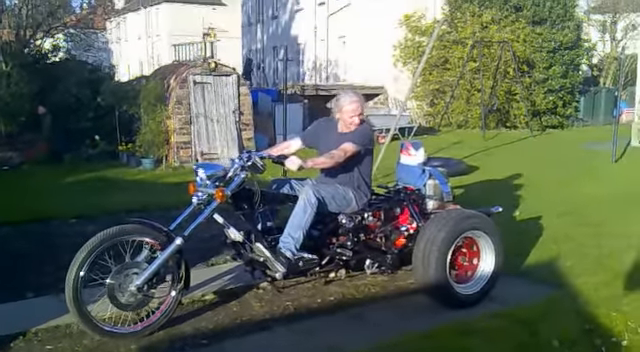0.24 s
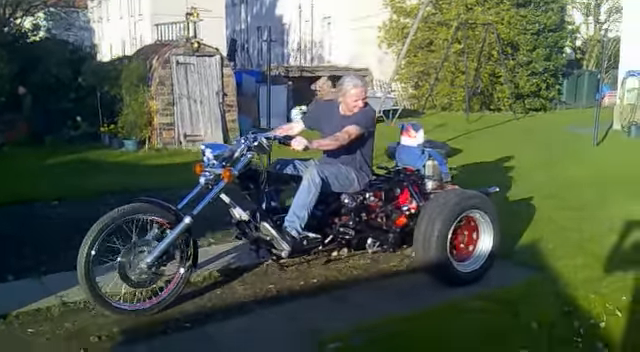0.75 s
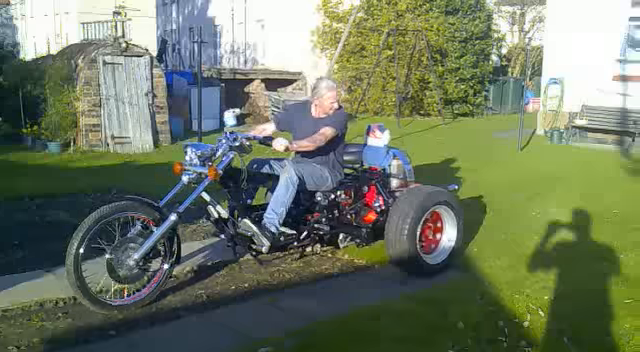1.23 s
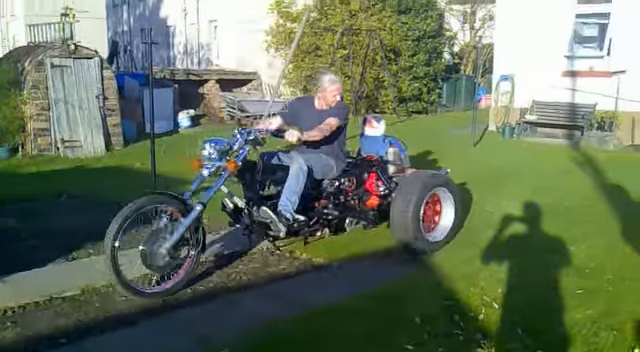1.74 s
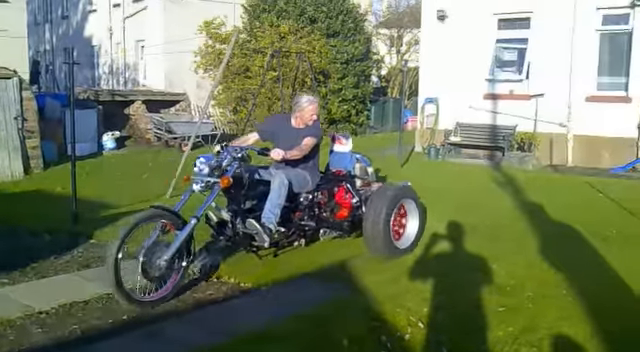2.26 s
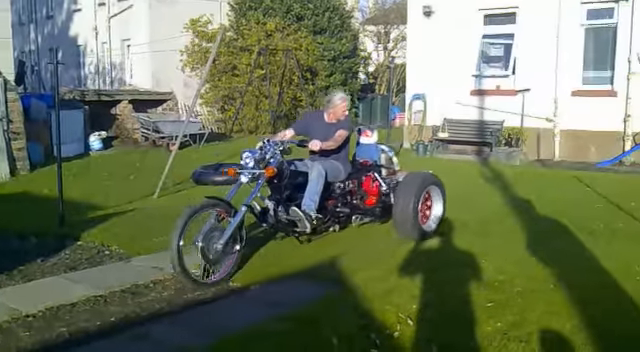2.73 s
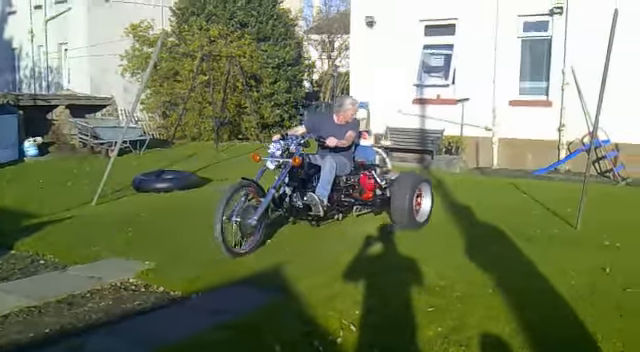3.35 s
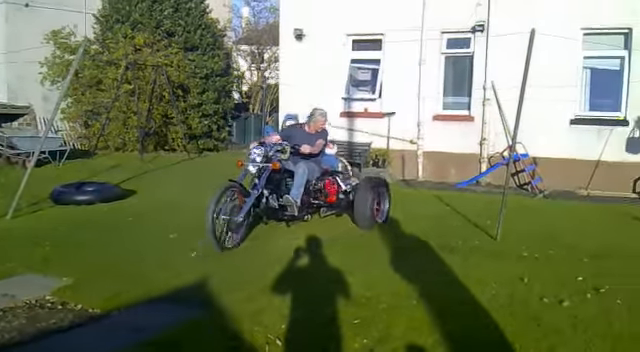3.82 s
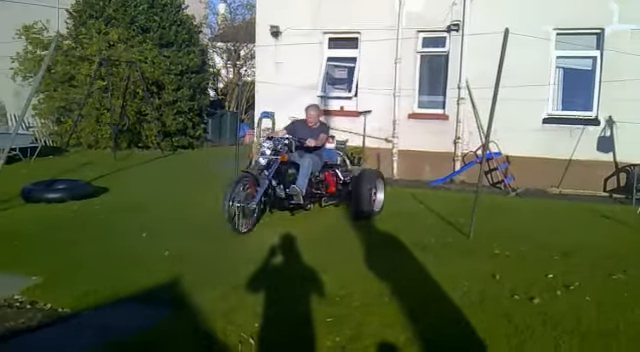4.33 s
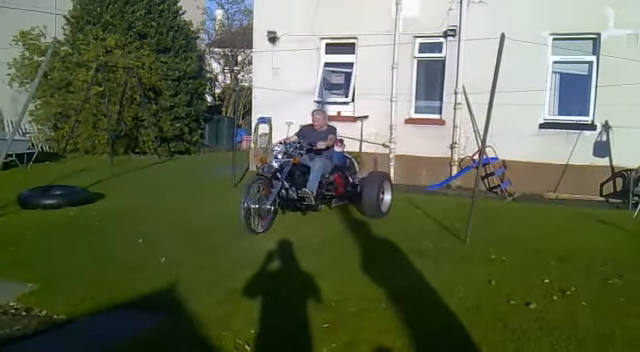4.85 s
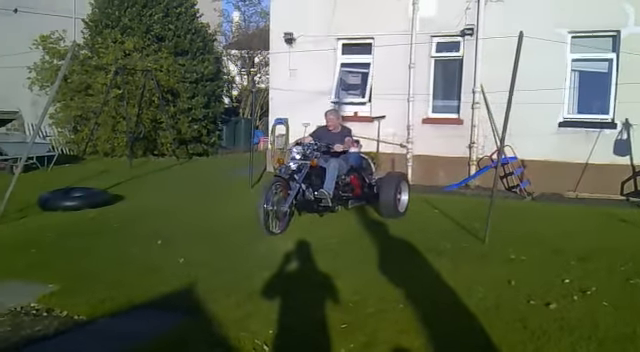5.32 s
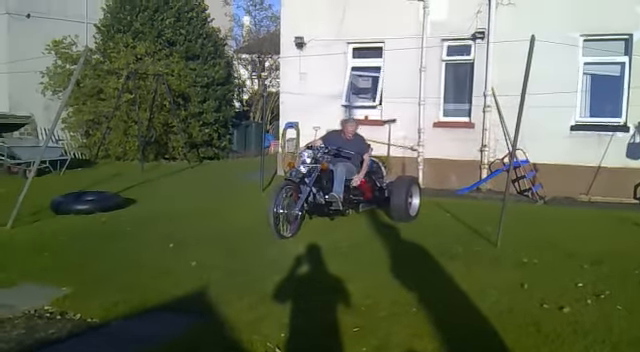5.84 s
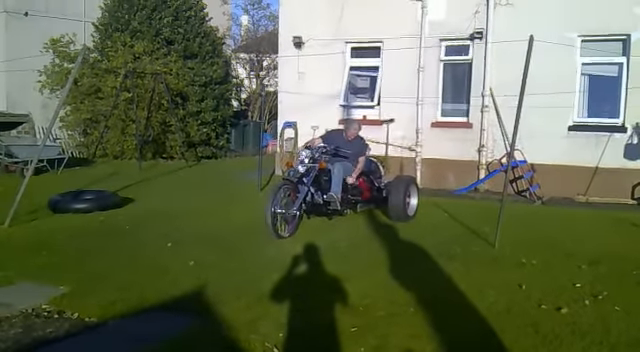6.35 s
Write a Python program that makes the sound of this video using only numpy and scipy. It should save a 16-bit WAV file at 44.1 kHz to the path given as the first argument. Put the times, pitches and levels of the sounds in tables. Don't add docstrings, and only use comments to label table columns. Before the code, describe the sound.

A small air-cooled engine on a lawn throbs at fast idle, revs hard, holds a rattly drone, then drops to a slow ticking tick-over.

```python
import sys
import numpy as np
from scipy import signal
from scipy.io import wavfile
from scipy.ndimage import uniform_filter1d

SR = 44100
rng = np.random.default_rng(int(sys.argv[2]) if len(sys.argv) > 2 else 0)


def field_ratio(decibels):
    return 10 ** (np.asarray(decibels, dtype=float) / 20)


def wav_out(sig):
    wavfile.write(sys.argv[1], SR, np.round(np.clip(np.atleast_2d(sig).T, -1, 1) * 32767).astype(np.int16))


N = 290178

# t/s, level/dB
EFFORT = [(0.0, -31), (1.15, -34.5), (1.39, -31.5), (1.61, -21.5), (1.85, -22.5), (2.07, -30.5),
          (2.58, -29), (3.04, -31.5), (4.32, -32), (4.71, -42.5), (5.13, -48), (5.46, -43.5), (6.49, -44.5),
          (6.58, -48.5)]
# t/s, share of the far front view/0-1
TURNING = [
    (0, 0.028),
    (1.3, 0.18),
    (2.2, 0.57),
    (3.2, 0.77),
    (6.58, 0.73),
]


def exhaust(speed, cycle):
    # order of the cycle, level/dB
    loaded = [(2, -59), (3, -40), (4, 26), (5, -5.5), (6, -13), (7, -11), (8, -19), (9, -5.5), (10, -12.5),
              (11, -18), (12, -39), (13, -3), (14, -22), (15, -17), (16, -30), (17, -10.5), (18, -33),
              (19, -21), (20, -32), (21, -47), (22, -25.5), (23, -56.5), (24, -24)]
    # order, level/dB
    light_idle = [(2, -41), (3, -52), (4, -18), (5, -21.5), (6, -16), (7, -40), (8, -3.5), (9, -28.5),
                  (10, -5), (11, -20), (12, -11), (13, -15), (14, -15), (15, -15), (16, -14), (17, -11.5),
                  (18, -34), (19, -17), (20, -27), (21, -6), (22, -13.5), (23, -10), (24, -19.5)]
    # order, level/dB
    part_throttle = [(2, -46), (3, -46), (4, -3), (5, -18), (6, -6.5), (7, -20), (8, -10.5), (9, -2.5),
                     (10, -1), (11, -64), (12, -21.5), (13, -12), (14, -6.5), (15, -29), (16, -22.5),
                     (17, -15.5), (18, -26), (19, -13.5), (20, -71), (21, -32), (22, -53), (23, -26),
                     (24, -25)]
    # order, level/dB
    tick_over = [(2, -57), (3, -27), (4, 11), (5, 8), (6, -12), (7, 11), (8, 9), (9, -10.5), (10, -25),
                 (11, -14), (12, -9), (13, -15), (14, 3), (15, -12), (16, -15.5), (17, -13), (18, -7),
                 (19, -20), (20, 5.5), (21, -34), (22, -45), (23, -66), (24, -5.5)]
    cylinder_turns = [0.0, .02, .52, .55]
    # f/Hz, width/Hz, level/dB
    pipe = [(65, 7.5, 15), (99.5, 22, 2.5), (138, 16, 5), (225.4, 57, 5)]
    # f/Hz, level/dB per Hz
    turbulence = [(30, -20), (60, -33), (150, -13), (260, -10), (380, -26)]
    # t/s, light share/0-1, part-throttle share/0-1, throb place/cycles
    throttle = [(0, 0.57, 0.33, 0.43), (.55, 0.48, 0.25, 0.66), (1.0, 0.8, 0.06, 0.51), (1.4, .8, 0, 0.56),
                (1.9, 0.02, 0.19, 0.94), (2.5, 0.16, 0.53, 0.93), (3.0, 0.43, 0.07, .92),
                (3.5, 0.2, 0.99, 0.58), (4.28, 0.33, 0.64, .86), (4.4, 0.03, 0, 0.76), (5.3, 0, 0.46, 0.92),
                (6.0, 0.2, 0.15, 0.92), (6.25, 0.4, 0.07, 0.84)]
    pulse_place = 0.45

    thin = slice(0, N, 10)
    light, easy, place = (np.clip(c[thin], 0, 1) for c in in_time(throttle))
    since, rise = (c[thin] for c in shut())
    slow = np.clip(rise * (0.41 + 0.093 * since), 0, 1)
    misfires = 0.12 + 0.3 * np.exp(-since / 0.4)
    rough = np.clip(0.13 + rise * misfires, 0, 0.9)
    sums, powers = 0, 1e-12
    patterns = zip(light_idle, loaded, part_throttle, tick_over)
    for (k, light_db), (_, load_db), (_, easy_db), (_, slow_db) in patterns:
        k = round(k)
        hz = k * speed[thin]
        level_db = load_db + light * (light_db - load_db)
        level_db = level_db + easy * (easy_db - load_db) + slow * (slow_db - load_db)
        pipe_db = sum(peak_db / (1 + ((hz - mid) / width) ** 2) for mid, width, peak_db in pipe)
        size = field_ratio(level_db + pipe_db)

        turns = k * (cycle[thin] - pulse_place) + cylinder_turns[k % 4]
        turns += 0.5 * (k % 4 == 2 and k > 12)
        turns += (place + 0.21 * (k // 4 - 1)) * (k % 2)
        turns += 0.012 * k * rough * drift(6)[thin]
        unsteady = field_ratio((1.6 + 2 * rough) * drift(4)[thin])
        wave = np.sqrt(2) * size * unsteady * np.cos(2 * np.pi * turns)

        bark = np.clip((hz - 80) / 10, 0, 1)
        split = np.array([1 - bark, bark])
        sums += wave * np.sqrt(split)
        powers += size ** 2 * split
    bands, centres = coloured(np.geomspace(38, 400, 9), patchy_db=2.5)
    rumble = (bands * field_ratio(at_hz(turbulence, centres)))[:, thin]
    noise = np.array([0.6 * rms_one(rumble[:3].sum(0)), 0.7 * rms_one(rumble[3:].sum(0))])
    mixed = np.sqrt(1 - rough ** 2) * sums / np.sqrt(powers) + rough * noise
    return signal.resample_poly((loudness() * mixed).sum(0), 10, 1)[:N]


def loudness():
    # t/s, half-length/s, boom level/dB, bark level/dB
    lurches = [(0.453, 0.57, 2.5, 1), (1.046, 0.085, -4, -1.5), (1.402, 0.11, -5, 0),
               (1.652, 0.058, 1.5, -1.5), (2.01, 0.15, -13, -3), (2.387, 0.08, -1.5, 2.5),
               (2.68, 0.06, 3.5, 1.5), (3.23, 0.08, -7, 1), (3.456, 0.13, -1.5, 2.5),
               (3.763, 0.11, 5.5, 0.5), (3.857, 0.036, 2, 2), (4.337, 0.018, -16, -10),
               (4.397, 0.057, 1, -9), (4.45, 0.076, 8.5, -1.5), (4.52, 0.028, -14, -6),
               (4.56, 0.023, 8.5, -4), (4.65, 0.044, -2, -1), (4.745, 0.038, 12, 2),
               (4.816, 0.034, -5, 4.5), (5.707, 0.33, -3, 6), (6.226, 0.062, 8.5, 4.5),
               (6.345, .025, -9, -5), (6.43, 0.066, 7, 3)]
    over_effort_db = np.array([[9.5], [6.5]])
    t = np.arange(0, N, 10) / SR
    humps_db = 0
    for s, half, boom_db, bark_db in lurches:
        humps_db = humps_db + np.exp(-((t - s) / half) ** 2) * np.array([[boom_db], [bark_db]])
    return field_ratio(in_time(EFFORT)[0][::10] + over_effort_db + humps_db)


def casing(speed, cycle):
    # f/Hz, level/dB per Hz
    side_view = [(190, -31), (330, -13), (375, -9.5), (671, 4.5), (1110, -6.5), (1300, 2.5), (1530, -11),
                 (2110, -5), (2480, -11.5), (3110, -10), (5300, -24), (6130, -29.5), (10400, -39.5),
                 (12500, -34.5), (15600, -47)]
    # f/Hz, level/dB per Hz
    front_view = [(190, -37), (330, -5.5), (527, 3.5), (802, -6), (942, 0.5), (1740, -6.5), (1920, -14),
                  (2110, -10.5), (2600, -14), (2960, -12.5), (7200, -32.5), (8460, -38.5), (10400, -43),
                  (12300, -40.5), (15600, -60)]
    # f/Hz, width/Hz, added level/dB
    fins = [(940, 120, -29), (1780, 83, -2), (2128, 185, -6.5), (2990, 160, -5.5), (5130, 560, -4)]
    puff_place, beat_place = 0.14, 0.85

    level_db = in_time(EFFORT)[0]
    top_db = -11.5 + 1.5 * shut()[1]
    depth_db = 2.6 + 0.12 * pull(speed)
    bands, centres = coloured(np.geomspace(330, 15800, 23), patchy_db=1.0)
    far = np.clip(in_time(TURNING)[0], 0, 1)
    bands = bands * ((1 - far) * field_ratio(at_hz(side_view, centres)) + far * field_ratio(at_hz(front_view, centres)))
    parts = np.array([bands[:13].sum(0), bands[13:].sum(0)])
    plain = parts.copy()
    for hz, width, peak_db in fins:
        r = np.exp(-np.pi * width / SR)
        poles = [1, -2 * r * np.cos(2 * np.pi * hz / SR), r * r]
        parts += field_ratio(peak_db) * signal.lfilter([(1 - r * r) / 2, 0, (r * r - 1) / 2], poles, plain)
    parts /= np.sqrt(uniform_filter1d(parts ** 2, size=SR, mode="reflect"))
    puff = 1.71 * np.exp(-2.5 * (4 * (cycle - puff_place) % 1)) - 0.9
    beat = puff + 0.4 * np.cos(2 * np.pi * (cycle - beat_place)) + 0.18 * drift(90)
    return field_ratio(level_db + depth_db * beat) * (parts[0] + field_ratio(top_db) * parts[1])


def fan(speed):
    turns = np.cumsum(92.9 * speed + 12 * drift(40)) / SR
    since = shut()[0]
    level_db = -48 + np.where(speed < 16.8, 1.0, 4.6) * (speed - 16.8)
    level_db += 5.5 * (1 - in_time(TURNING)[0])
    level_db -= 35 * np.exp(4 * since) * since
    level_db += 0.3 * pull(speed) * (speed > 17)
    return np.sqrt(2) * field_ratio(level_db + 2.2 * drift(40)) * np.sin(2 * np.pi * turns)


def valves(cycle):
    # t/s, place/cycles, low ring level/dB, high ring level/dB
    closings = [(0, 1.12, -42, -56), (.46, 0.87, -41.5, -74), (1.2, 0.79, -39.5, -46),
                (1.7, 0.91, -31, -34), (1.93, 1.15, -52, -59), (2.47, 1.26, -46, -35),
                (3.06, .84, -44, -43), (3.76, 0.84, -51, -37), (4.68, 0.92, -64, -64)]
    closing_db = [-8, -15, -9.5, -27]
    # f/Hz, t60/s
    knocks = [(3100, 0.0081), (4000, 0.02), (4550, 0.0059), (5200, 0.0048), (6600, 0.0042)]
    # f/Hz, t60/s
    rings = [(8350, 0.0082), (8800, 0.0062), (9400, .006)]
    # f/Hz, t60/s
    pings = [(10700, 0.0062), (12100, 0.008), (13000, 0.0017)]
    # f/Hz, t60/s
    cover = [(6300, .008), (6850, .015)]
    # f/Hz, t60/s
    slow_knocks = [(3100, 0.0096), (4050, 0.0067), (4550, 0.013), (5200, 0.0061)]

    place, ring_db, ping_db = in_time(closings)
    count = np.floor(4 * (cycle - place)).astype(int)
    at = np.flatnonzero(np.diff(count) > 0) + 1
    at = at[at < closings[-1][0] * SR]
    own_db = np.array(closing_db)[count[at] % 4] + 1.1 * rng.standard_normal(len(at))
    out = strike(at / SR, ring_db[at] + own_db, rings, 1.8, 0.001)
    out += strike(at / SR, ping_db[at] + own_db, pings, 4.8, 0.001)
    out += strike(at / SR, ring_db[at] + 0.5 * own_db + 2.0, knocks, 3.6, 0.0017)

    s, peak_db, knock_db = tappets()
    out += strike(s, 0.61 * peak_db - 23, cover, 2.5, 0.0023)
    out += strike(s, 0.7 * peak_db - 12.5, rings[:2], 0.71, 0.0015)
    out += strike(s, knock_db, slow_knocks, 1.4, 0.0022)
    out += strike(s, 0.44 * peak_db + 0.59 * knock_db - 2.5, pings[1:], 3.6, 0.0009)
    return out


def tappets():
    # t/s, leading tappet's ring level/dB, opposite tappet's knock level/dB
    rounds = [(4.772, -46, -47), (4.877, -46, -58), (4.972, -47, -54), (5.069, -43, -49),
              (5.1675, -47, -42), (5.269, -50, -51), (5.3668, -60, -46), (5.4683, -38.5, -42),
              (5.572, -42, -40), (5.6774, -35, -37), (5.7824, -30, -31.5), (5.8896, -36, -40),
              (6.001, -36, -37), (6.1147, -29, -41), (6.231, -22.5, -34), (6.3587, -38, -40),
              (6.4896, -39, -60), (6.63, -43, -50)]
    places = [0, .265, .505, .765]
    follow_ring_db = [-51, -47, -50]
    other_knock_db = [-45, -48, -48]

    s, lead_db, opposite_db = np.transpose(rounds)[:, :, None]
    at = s[:-1] + np.diff(s, axis=0) * places
    luck = 5.5 * rng.standard_normal((len(at), 2, 3))
    luck += 6 * (s[:-1, None] - 5.5)
    ring_db = np.hstack([lead_db[:-1], follow_ring_db + luck[:, 0]])
    knock_db = np.insert(other_knock_db + luck[:, 1], [2], opposite_db[:-1], axis=1)
    heard = at < 6.54
    return at[heard], ring_db[heard], knock_db[heard]


def snaps():
    # t/s, peak level/dB
    cracks = [
        (3.6548, -27.5),
        (4.4273, -27.5),
        (5.2914, -41),
    ]
    clicks = np.full(N, 1e-18)
    for s, peak_db in cracks:
        clicks[round(s * SR)] = field_ratio(peak_db + 18.0)
    bright = signal.sosfilt(signal.butter(2, [4600, 8300], "band", fs=SR, output="sos"), clicks)
    body = signal.sosfilt(signal.butter(1, [500, 3500], "band", fs=SR, output="sos"), clicks)
    return bright + 0.16 * body


def air():
    return field_ratio(-62) * rng.standard_normal(N)


def shut():
    since = np.maximum(np.arange(N) / SR - 4.3, 0)
    return since, np.clip(since / 0.11, 0, 1)


def pull(speed):
    return uniform_filter1d(np.maximum(np.gradient(speed) * SR, 0), size=SR // 10)


def strike(at_s, peak_db, modes, spread_db, rattle_s):
    at = np.minimum((np.asarray(at_s) * SR).astype(int), N - 1)
    luck = rng.standard_normal((len(at), len(modes)))
    fade = np.exp(-1 / (rattle_s * SR))
    out = 0
    for k, (hz, t60) in enumerate(modes):
        clicks = np.full(N, 1e-18)
        clicks[at] = field_ratio(peak_db + spread_db * luck[:, k])
        swell = signal.lfilter([(1 - fade) ** 1.5 * 2], [1, -2 * fade, fade ** 2], clicks)
        burst = swell * rng.standard_normal(N)
        r = field_ratio(-60 / (t60 * SR))
        w = 2 * np.pi * min(hz, 0.45 * SR) / SR
        out = out + signal.lfilter([0, np.sin(w)], [1, -2 * r * np.cos(w), r * r], burst)
    edges = [modes[0][0] * 0.9, modes[-1][0] * 1.1]
    return signal.sosfilt(signal.butter(2, edges, "band", fs=SR, output="sos"), out)


def coloured(edges, patchy_db):
    white, rows = rng.standard_normal((2, N)), []
    for k, (low, high) in enumerate(zip(edges, edges[1:])):
        band_filter = signal.butter(2, [low, high], "band", fs=SR, output="sos")
        band = signal.sosfilt(band_filter, white[k % 2])
        rows.append(band * field_ratio(patchy_db * drift(19.0)))
    return np.array(rows), np.sqrt(edges[1:] * edges[:-1])[:, None]


def drift(rate):
    r = np.exp(-80 * np.pi * rate / SR)
    slow = signal.lfilter([1], [1, -2 * r, r * r], rng.standard_normal(N // 40 + 2002))
    slow = slow[2000:]
    return np.interp(np.arange(N) / 40, np.arange(len(slow)), rms_one(slow))


def rms_one(x):
    return x / np.sqrt(np.mean(x ** 2) + 1e-20)


def in_time(rows):
    s, *columns = np.transpose(rows)
    return [np.interp(np.arange(N) / SR, s, c) for c in columns]


def at_hz(spectrum, hz):
    table_hz, table_db = np.transpose(spectrum)
    return np.interp(np.log(hz), np.log(table_hz), table_db)


def scene():
    # t/s, four-stroke cycles per s
    speed_curve = [(0.0, 14.55), (0.44, 15.7), (0.8, 13.7), (1.05, 12.85), (1.39, 12.75), (1.78, 18.0),
                   (1.94, 19.05), (2.69, 17.9), (3.15, 16.82), (3.78, 16.68), (4.28, 19.0), (4.46, 16.4),
                   (4.62, 15.6), (4.76, 11.08), (5.05, 10.2), (5.75, 9.44), (6.2, 8.5), (6.45, 7.45)]
    speed = in_time(speed_curve)[0]
    cycle = np.cumsum(speed) / SR
    engine = exhaust(speed, cycle) + casing(speed, cycle) + fan(speed) + valves(cycle)
    return (engine + snaps() + air())[None]


def band_limit(x):
    return signal.sosfilt(signal.butter(12, 15770, fs=SR, output="sos"), x)


def record(dry):
    cut = signal.sosfilt(signal.butter(1, 15, "high", fs=SR, output="sos"), dry)
    rounded = 0.91 * np.tanh(cut / 0.94)
    return band_limit(np.clip(rounded, -0.7, 0.7))


dry = scene()
out = record(dry)
wav_out(out)
```